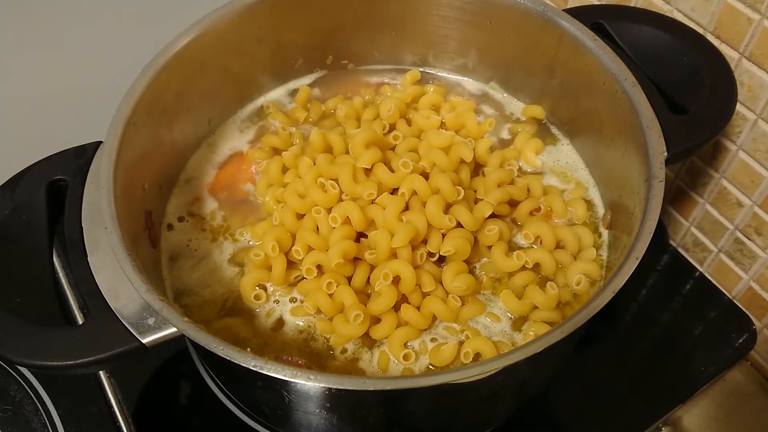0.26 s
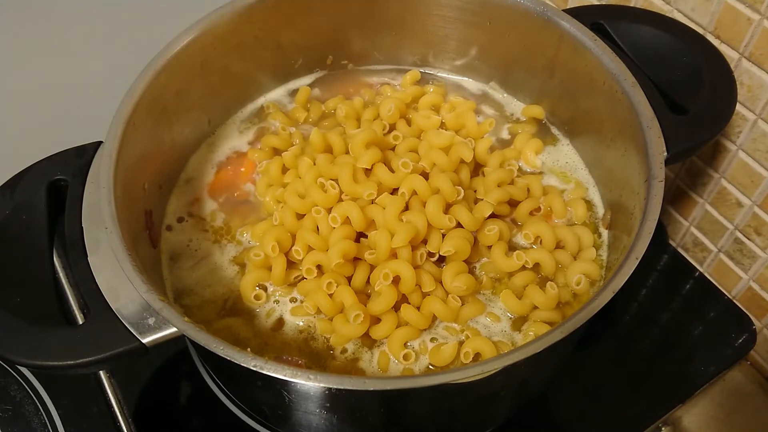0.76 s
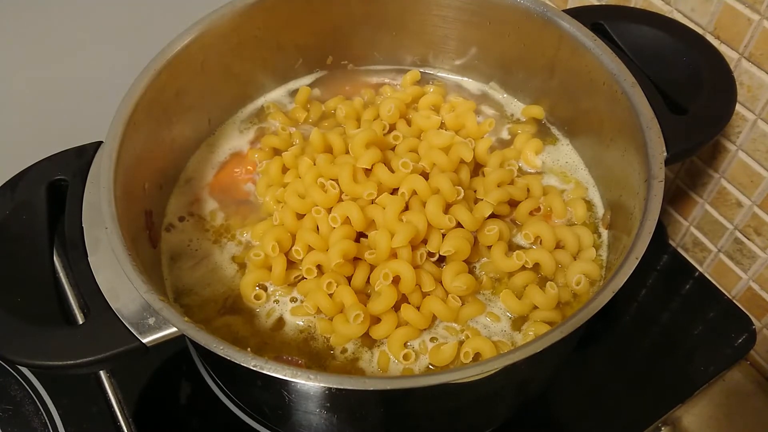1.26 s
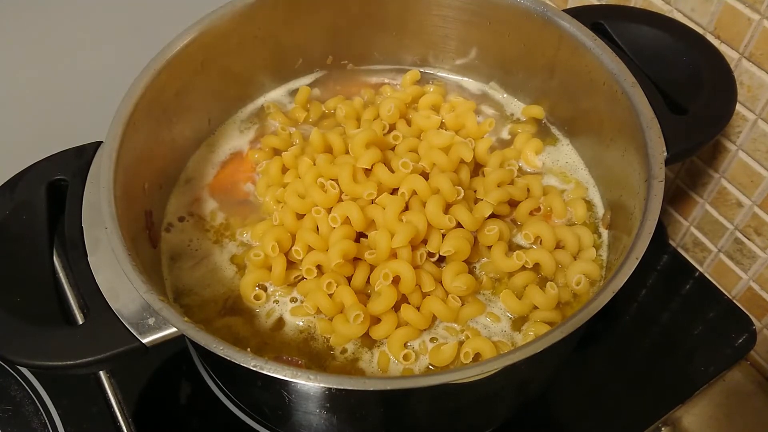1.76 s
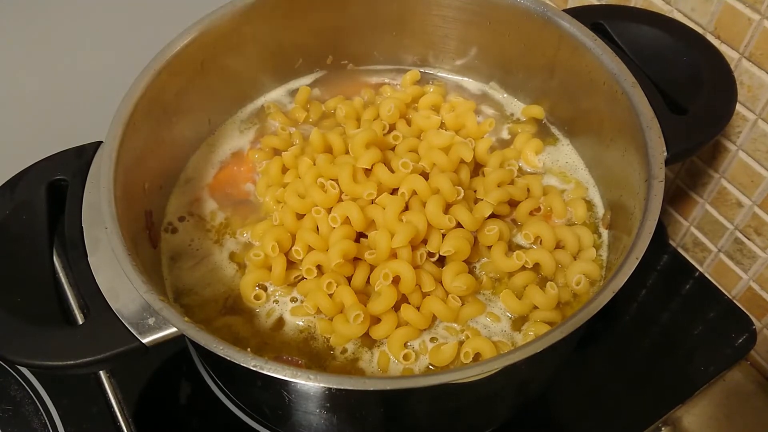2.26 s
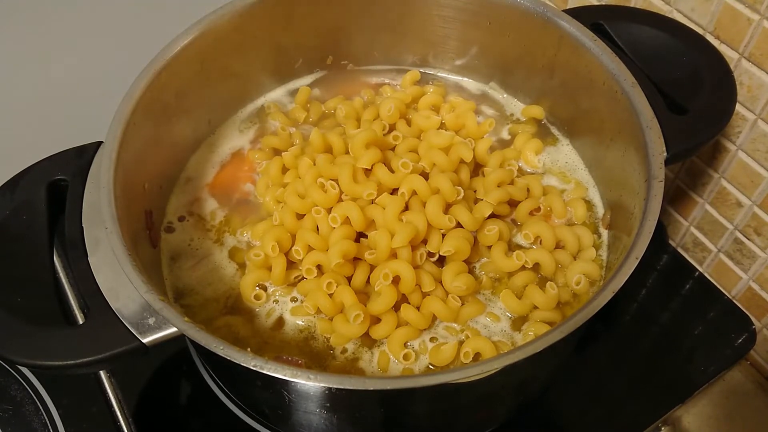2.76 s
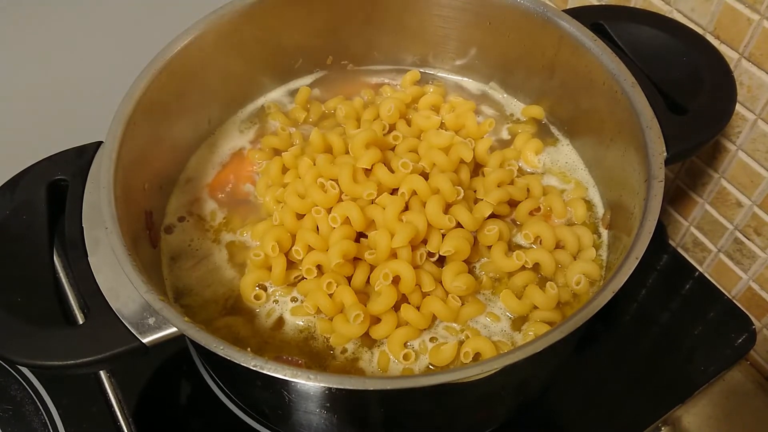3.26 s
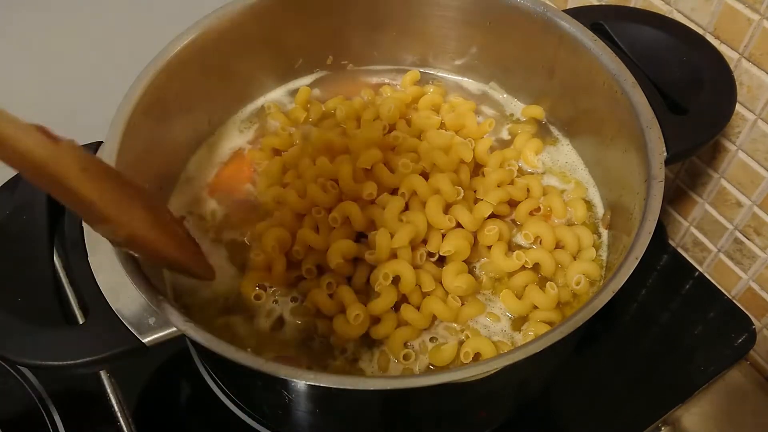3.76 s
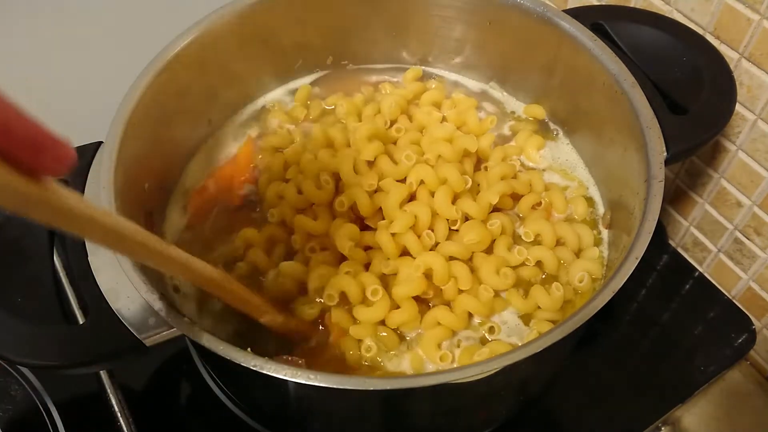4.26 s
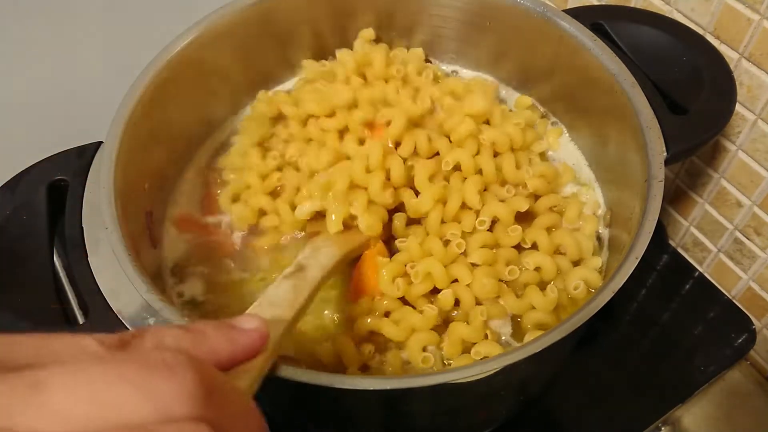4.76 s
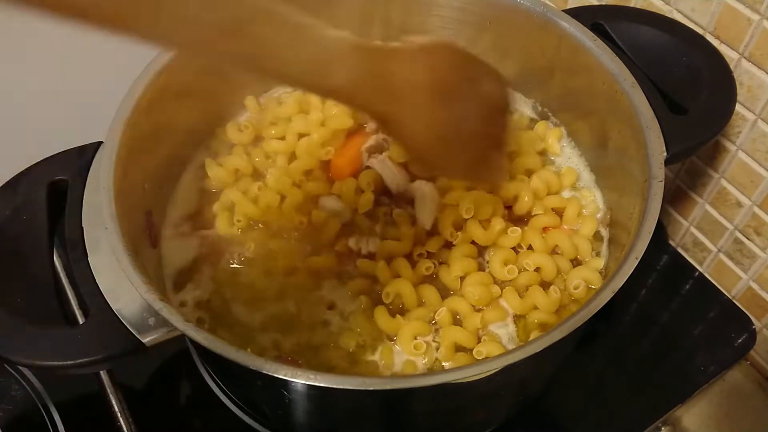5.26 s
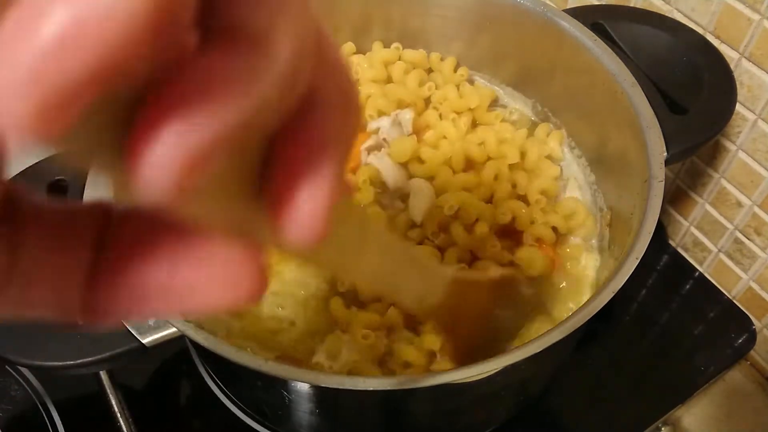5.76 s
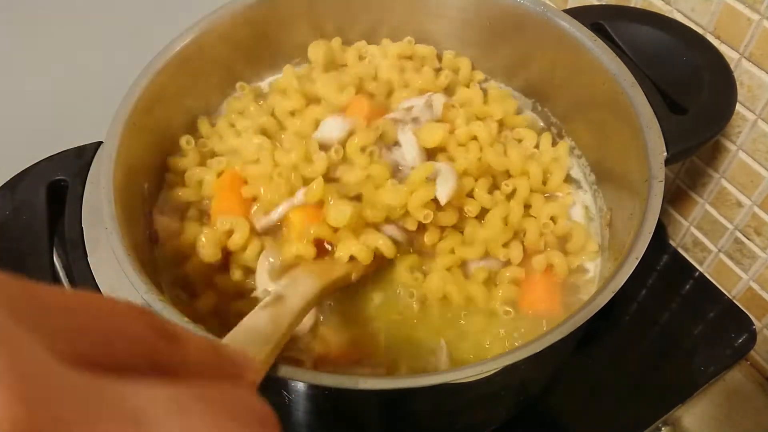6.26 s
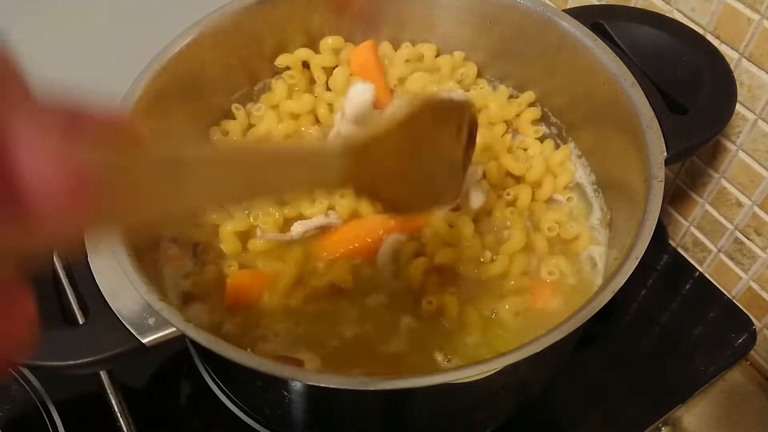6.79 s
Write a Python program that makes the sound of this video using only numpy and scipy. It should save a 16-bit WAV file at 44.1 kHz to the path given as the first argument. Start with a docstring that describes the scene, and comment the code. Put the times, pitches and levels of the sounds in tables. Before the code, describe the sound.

Over a faint fizz and hob hum come two ringing clatters, followed by hard macaroni being stirred through sloshing broth.

```python
"""Macaroni simmers in a steel pot of broth and is stirred, close to the microphone in a small tiled kitchen.
The foam fizzes and pops a little to the right, over the rumble of the pot and the hum of the hob.
A utensil clinks, and something hard is set down nearby with two loud, ringing clatters.
Then a wooden spoon knocks on the pot and turns the still hard pasta over: the broth sloshes, wet tubes
crackle against each other and tick on the steel, and a few air pockets glug."""
import sys
import numpy as np
from scipy import signal
from scipy.fft import rfft, irfft
from scipy.io import wavfile
from scipy.ndimage import uniform_filter1d

SR = 44100
rng = np.random.default_rng(int(sys.argv[2]) if len(sys.argv) > 2 else 0)


def pcm_store(signal):
    """Save signal as 16-bit PCM."""
    levels = np.round(np.clip(np.atleast_2d(signal), -1, 1) * 32767)
    wavfile.write(sys.argv[1], SR, levels.astype(np.int16).T)


N = 310023

# pushes of the spoon through the pasta: [strongest_s, rise_s, fall_s, crackle_db, slosh_db, spray_db]
SPOON_PUSHES = [(4.11, 0.05, 0.3, -61, -55.5, -86), (4.42, 0.32, 0.6, -55, -60.5, -61),
                (4.71, 0.22, 0.2, -50, -53, -53.5), (4.9, 0.07, 0.32, -43, -49, -50),
                (5.13, 0.17, 0.24, -55, -56, -56), (5.589, 0.08, 0.6, -66, -54, -84),
                (5.99, 0.26, 0.2, -61, -59, -59.5), (6.141, 0.1, 0.25, -53, -49, -59),
                (6.419, 0.26, 0.28, -52.5, -51.5, -72), (6.74, 0.25, 0.36, -60, -54, -69)]
# tone colours of sloshing broth, rubbing pasta and the finest spray: [frequency_hz, relative_db]
SLOSH_SPECTRUM = [(150, -17.5), (330, 2), (400, -13.5), (540, 0.5), (680, -5), (830, 2.5), (960, -4.5),
                  (1150, -1), (1700, 0), (2600, -7.5), (5000, -44)]
CRACKLE_SPECTRUM = [(900, -4), (2000, -1), (2800, -10), (3150, -2.5), (3550, 2), (4400, 6), (6000, 2),
                    (8200, 12.5), (10000, 0), (15000, -39)]
SPRAY_SPECTRUM = [(6000, 11), (10000, 1.5), (12000, -4), (15500, -0.5), (17000, -35)]
# modes of the pot wall that sing along with the crackle: [pitch_hz, relative_db]
POT_WALL_MODES = [(3115, -11.5), (4840, -24), (5060, -24.5), (7975, -18)]
# the sharpest ticks, of bursting foam and later of pasta and spoon on the steel:
# [start_s, level_db, pitch_hz, left_over_right_db, top_octave_db]
SHARP_TICKS = [(0.3018, -43, 2040, -4.0, -78), (1.2694, -47.5, 2030, -1, -82),
               (1.3259, -50.5, 3250, -2, -81), (3.038, -39, 2920, -5.5, -80), (4.0694, -36, 3770, 0, -68),
               (4.2423, -39, 4140, 0, -63), (4.4792, -34, 8650, -2.5, -54), (4.618, -33.5, 8940, 0, -54),
               (4.672, -26.5, 4800, -2, -54), (4.7485, -25.5, 3340, -5, -47), (4.834, -30, 4430, -2, -57),
               (4.8964, -18.5, 5060, -2, -47), (5.0179, -29, 7570, -4, -49), (5.048, -24.5, 4270, -3, -54),
               (5.1804, -34.5, 2250, 0, -50.5), (5.4961, -21.5, 4060, 1, -58), (5.5672, -26, 2560, -1, -68),
               (5.5866, -27, 2820, -3, -62), (5.662, -32.5, 1590, -1, -77), (5.785, -35.5, 3630, -3, -71),
               (5.95, -31.5, 5600, -6.5, -67), (6.122, -31.5, 6060, -1, -51.5),
               (6.1873, -31, 3230, -2.0, -73), (6.3774, -31, 3200, -9, -73), (6.4468, -35.5, 2380, -2, -71),
               (6.5134, -28, 5140, 0, -47), (6.7524, -35.5, 2570, 6, -73)]
# dull knocks on the pot, mostly from the wooden spoon: [start_s, relative_db, dull_above_hz, t60_s]
POT_KNOCKS = [(0.3046, -44.5, 500, 0.018), (3.7693, -32, 2230, 0.073), (3.8559, -38, 546, 0.13),
              (4.093, -42, 2180, 0.065), (5.4171, -42.5, 750, 0.19), (5.4726, -35, 2980, 0.034),
              (5.4978, -31, 3500, 0.015), (6.446, -37.5, 1500, .04)]
# single air pockets in the broth: [start_s, level_db, first_pitch_hz, last_pitch_hz, length_s]
AIR_POCKETS = [(3.072, -45, 662, 630, 0.019), (3.112, -52.5, 756, 636, 0.043),
               (4.395, -50.5, 2120, 2160, 0.018), (4.59, -49, 161, 171, 0.027),
               (4.716, -32.5, 378, 252, 0.022), (5.223, -42.5, 2090, 2200, 0.0089),
               (5.409, -44, 430, 314, 0.019), (6.076, -46, 305, 355, 0.059),
               (6.864, -43.5, 1510, 1730, 0.0044)]
# tone colour of the fizzing foam: [frequency_hz, relative_db]
FIZZ_SPECTRUM = [(200, -6), (500, 2), (900, 4.5), (1300, -1.5), (2100, 1), (3000, -6.5), (4000, -10),
                 (4900, -12), (7000, -18), (10000, -23.5), (16000, -46)]
# contacts of the hard object: [start_s, thud_db, ring_db, flatness (0 on edge, 1 flat), treble_db]
OBJECT_CONTACTS = [(2.2528, -14, -27, 0.6, -12), (2.2575, -10, -15, 0.24, 3.5),
                   (2.2616, -12.5, -48, 0.2, 8), (2.2815, -24, -32, 0.2, 11), (2.3543, -20, -32.5, 0.2, -3),
                   (2.6399, -9, -17, 0.96, -3.5), (2.6532, -23.5, -35, 1, 9.5),
                   (2.6603, -24.5, -32, 0.8, 11)]
# tone colour of the object's dull body: [frequency_hz, relative_db]
THUD_SPECTRUM = [(100, -30), (400, -12), (490, -13), (580, -1.5), (850, -0.5), (1250, -4.5), (1700, -7),
                 (2050, -5.5), (2700, -8), (3750, -19.5), (4400, -10), (5100, -29), (5600, -22),
                 (8500, -27), (15000, -51)]
# the object's strong modes: [pitch_hz, struck_on_edge_db, struck_flat_db, t60_s]
OBJECT_MODES = [(556, -9.5, -10, 0.13), (602, -16, -9.5, 0.17), (711, -23, 0.5, 0.12),
                (833, -12.5, -30, 0.39), (928, -13.5, -19, 0.26), (1034, -9.5, -34, 0.5),
                (1104, -12, -16, 0.16), (1257, -17.5, -25, 0.27), (1450, -15, -20, 0.51),
                (1560, -4, 3.5, 0.21), (1720, -22, -19, 0.13), (1898, 6.5, -12.5, 0.28),
                (1958, -1, -13.5, 0.21), (2016, -3.5, -1.5, 0.22), (2170, -23, -0.5, 0.14),
                (2470, -19, -6, 0.37), (2576, -7.5, -10, 0.39), (2710, -24, -14.5, 0.35),
                (2860, -15.5, -24.5, 0.36), (3250, -3, -9.5, 0.2), (3310, -3, -14, 0.21),
                (3473, -20, -18.5, 0.36), (4080, -17, -17, 0.19), (4345, -11.5, -33, 0.27),
                (4500, -15, -13, 0.19), (5500, -11.5, -29, 0.26), (5560, -13.5, -19, 0.17),
                (6500, -20.5, -27.5, 0.26), (6785, -16, -36.5, 0.21), (7275, -16, -40, .25),
                (9660, -28.5, -43, 0.28), (13600, -36.5, -44, 0.25)]
# outline of its crowd of weak high modes: [frequency_hz, relative_db]
OVERTONE_SPECTRUM = [(3400, -22.5), (4400, -17.5), (5100, -46.5), (5700, -28), (8400, -30), (9200, -38),
                     (13800, -40)]
# the utensil's touch: [start_s, relative_db]
UTENSIL_CONTACTS = [(2.0345, -22.5)]
# tone colour of the utensil: [frequency_hz, relative_db]
UTENSIL_SPECTRUM = [(300, -15), (700, -15.5), (880, 6), (1050, -20.5), (2200, -14.5), (2950, 1),
                    (3300, -3.5), (3950, 1), (4300, -16), (5800, -26), (6550, -11), (7200, -23),
                    (10500, -28), (15500, -38)]
# swells of the hob's hum: [start_s, length_s, level_db]
HUM_SWELLS = [(0.0, 0.36, -53.5), (0.374, 0.36, -46), (1.105, 0.54, -47.5), (1.51, 0.36, -46.5),
              (6.5, 0.33, -53.5)]
# tone colour of the heated pot's rumble: [frequency_hz, relative_db]
RUMBLE_SPECTRUM = [(25, -29.5), (42, -34), (62, 1), (80, -3.5), (98, 0.5), (160, 0), (205, -9.5), (250, -4),
                   (285, -12.5), (335, -4), (385, -17), (480, -13.5), (700, -27.5), (1500, -64.5)]
# reverberation of the tiled kitchen: [frequency_hz, t60_s]
KITCHEN_DECAY = [(250, 0.53), (800, 0.23), (2200, 0.38), (6000, 0.21), (14000, 0.27)]


def stirring():
    """The spoon sloshes broth, rubs wet pasta, squeezes air from the tubes and tears films of foam."""
    clumping = from_db(1.3 * drift(rate_hz=34))  # the pasta catches and gives way in clumps
    crackle_gain, slosh_gain, spray_gain = spoon_pushes() * clumping
    slosh = grains(low_hz=280, high_hz=3500, cycles=14, spread_db=3, count=2800)
    crackle = grains(low_hz=1500, high_hz=11000, cycles=11, spread_db=3.6, count=3000)
    squelch = grains(low_hz=2000, high_hz=7500, cycles=55, spread_db=3.5, count=600)
    spray = grains(low_hz=8500, high_hz=16000, cycles=7, spread_db=4, count=1500)
    rubbing = rms_one(coloured(crackle + squelch, CRACKLE_SPECTRUM)) + pot_wall(crackle)
    wet_pasta = (slosh_gain * rms_one(coloured(slosh, SLOSH_SPECTRUM))
                 + crackle_gain * rms_one(rubbing)
                 + spray_gain * rms_one(coloured(spray, SPRAY_SPECTRUM)))
    touches = pasta_touches(activity=crackle_gain + slosh_gain)
    return kitchen(wet_pasta, wet_db=-3, build_s=0.00058) * panned(-1.2) + ticks(touches, wet_db=-9.5)


def spoon_pushes():
    """Gains of crackle, slosh and spray over time: each push builds and dies away on a hollow curve."""
    t, power = np.arange(N) / SR, np.zeros((3, N))
    for strongest_s, rise_s, fall_s, *levels_db in SPOON_PUSHES:
        rising, falling = 1 + (t - strongest_s) / rise_s, 1 - (t - strongest_s) / fall_s
        effort = np.clip(np.minimum(rising, falling), 0, 1) ** 1.3
        power += (from_db(levels_db)[:, None] * effort) ** 2
    return np.sqrt(power)


def pot_wall(crackle, width_hz=39):
    """The steel wall picks narrow bands out of the crackle and sings along."""
    return sum(from_db(db) * rms_one(cut(crackle, [hz - width_hz / 2, hz + width_hz / 2], "band", order=1))
               for hz, db in POT_WALL_MODES)


def pasta_touches(activity, count=48, low_hz=2420, high_hz=7000, spread_db=2):
    """Rows for ticks(): hard tubes hit the steel more often and louder as more of them are moved."""
    when, size, pitch, place = rng.random((count, 4)).T
    share_stirred = np.cumsum(activity) / np.sum(activity)
    at = np.searchsorted(share_stirred, (np.arange(count) + when) / count)
    level_db = -33.5 + 10 * np.log10(activity[at] / activity.max()) + spread_db * (2 * size - 1)
    pitch_hz = low_hz * (high_hz / low_hz) ** pitch
    left_db, top_db = 1 - 6 * place, level_db - 30
    return np.column_stack([at / SR, level_db, pitch_hz, left_db, top_db])


def ticks(rows, wet_db, crest_db=22, lead_in_s=0.004, lead_in_db=-22):
    """Small snaps in the pot, each with a brief pitched ring and a bright top."""
    out = np.zeros((2, N))
    for start_s, level_db, hz, left_db, top_db in rows:
        snap = burst(t60_s=0.017, alike=0.33) + from_db(-4.5) * burst(t60_s=0.04, alike=0.12)
        ring = cut(snap, [hz / 1.06, hz * 1.06], "band", order=1)
        tick = cut(snap, [hz / 1.53, hz * 1.94], "band", order=1) + from_db(4.5) * ring
        tick = cut(cut(tick, 8300, "low", order=4), 720, "high")
        tick = from_db(level_db - crest_db) * rms_one(tick)
        top = cut(burst(t60_s=0.018, alike=0.25), [7500, 14000], "band")
        top = from_db(top_db - 10.5) * rms_one(top)
        # a faint lead-in just ahead softens each tick's attack
        add(out, start_s - lead_in_s * rng.uniform(0.5, 1), from_db(lead_in_db) * panned(left_db) * tick)
        add(out, start_s, panned(left_db) * (tick + top))
    return kitchen(out, wet_db=wet_db, build_s=0.001)


def pot_knocks():
    """Wood on the liquid-damped pot: a short, dull blow, answered by a hollow thud."""
    out = np.zeros((2, N))
    for start_s, level_db, dull_hz, t60_s in POT_KNOCKS:
        blow = burst(t60_s, alike=0.21, length_s=0.2)
        hollow = from_db(0.5) * cut(blow, [310, 520], "band")
        knock = cut(cut(blow, dull_hz, "low"), 240, "high") + hollow
        add(out, start_s, from_db(level_db + 5) * knock / np.abs(knock).max())
    return kitchen(out, wet_db=-9, build_s=0.02)


def bubbles():
    """Air pockets in the broth ring briefly, gliding as they change shape."""
    out = np.zeros((2, N))
    for start_s, level_db, first_hz, last_hz, length_s in AIR_POCKETS:
        age = seconds(length_s) / length_s
        phase = 2 * np.pi * np.cumsum(first_hz + (last_hz - first_hz) * age) / SR
        add(out, start_s, from_db(level_db) * np.sin(np.pi * age ** 1.04) * np.sin(phase))
    return kitchen(out, wet_db=-10, build_s=0.007) * panned(-7.5)


def simmer():
    """Foam fizzes evenly just right of the microphone, with a faint prickle of bursting bubbles."""
    fizz = coloured(noise_pair(N, alike=0.061), FIZZ_SPECTRUM) * from_db(-60.5 + 1.1 * drift(rate_hz=12))
    prickle = grains(low_hz=900, high_hz=7000, cycles=12, spread_db=4, count=260)
    prickle = kitchen(cut(prickle, 4000, "low", order=1), wet_db=-8, build_s=0.0027)
    return (fizz + from_db(-71.5) * prickle) * panned(-2.8)


def foam_pops():
    """Now and then a larger bubble bursts in the foam with a short pitched pip."""
    pips = grains(low_hz=1200, high_hz=5000, cycles=40, spread_db=2, count=70)
    pips = kitchen(cut(pips, 2500, "low", order=1), wet_db=-12, build_s=0.002)
    return from_db(-73) * pips * panned(-2.5)


def clatter():
    """Nearby, a hard object lands on its edge, bounces and drops flat; each contact thuds and rings."""
    thuds, rings, t = np.zeros((2, N)), np.zeros((2, N)), seconds(0.5)
    hz, edge_db, flat_db, t60_s = object_modes().T
    attack = 1 - np.exp(-t / 0.0012)
    modes = np.exp((2j * np.pi * hz - np.log(1000) / t60_s)[:, None] * t) * attack
    phase_offset = np.minimum(hz / 2200, 0.75)  # higher modes differ more between left and right
    for start_s, thud_db, ring_db, flatness, treble_db in OBJECT_CONTACTS:
        thud = burst(t60_s=0.036, alike=0.94)
        shelf = (from_db(treble_db) - 1) * cut(thud, 2500, "high", order=1)
        add(thuds, start_s, from_db(thud_db) * (thud + shelf))
        strength = from_db(ring_db + edge_db + flatness * (flat_db - edge_db))
        phase = 2 * np.pi * rng.random(len(hz))
        phase = phase + phase_offset * rng.choice([-1, 1], len(hz)) * [[1], [-1]]
        add(rings, start_s, ((strength * np.exp(1j * phase)) @ modes).real)
    sound = from_db(-3) * kitchen(coloured(thuds, THUD_SPECTRUM), wet_db=-3, build_s=0.004) + rings
    # the object is off to the right, so its treble is shaded on the left
    treble = cut(sound + 1e-18, 930, "high", order=1)
    return (sound - treble) * panned(3) + treble * panned(-5.5)


def object_modes(weak_count=42, weak_t60_s=0.27):
    """The hard object's strong modes, plus weak high ones, about evenly spaced and of chance strength."""
    hz = np.linspace(3700, 13800, weak_count) + rng.uniform(-70, 70, weak_count)
    edge_db = at_hz(OVERTONE_SPECTRUM, hz) + 3.34 * rng.standard_normal(weak_count)
    weak_modes = np.column_stack([hz, edge_db, edge_db - 6, np.full(weak_count, weak_t60_s)])
    return np.vstack([OBJECT_MODES, weak_modes])


def clink():
    """To the right, a utensil touches something hard once."""
    out = np.zeros((2, N))
    for start_s, level_db in UTENSIL_CONTACTS:
        add(out, start_s, from_db(level_db - 2.5) * burst(t60_s=0.033, alike=0.19))
    return kitchen(coloured(out, UTENSIL_SPECTRUM), wet_db=-6, build_s=0.004) * panned(-4.5)


def hob(hum_hz=125.6, settle_start_s=3.65, settle_length_s=1.0):
    """A wavering, swelling hum over the heated pot's rumble; both sink a little as the stirring starts."""
    t = np.arange(N) / SR
    settled_db = -2 * np.clip((t - settle_start_s) / settle_length_s, 0, 1)
    swells = sum(from_db(db) * np.sin(np.pi * np.clip((t - start_s) / length_s, 0, 1))
                 for start_s, length_s, db in HUM_SWELLS)
    level = from_db(-55 + settled_db + 2.2 * drift(rate_hz=6)) + swells
    phase = 2 * np.pi * np.cumsum(hum_hz + 1.34 * drift(rate_hz=12)) / SR
    hum = level * from_db(1.2 * drift(rate_hz=9.1)) * np.sin(phase)
    rumble = from_db(-53.5 + settled_db) * coloured(noise_pair(N, alike=0.94), RUMBLE_SPECTRUM)
    return (hum + rumble) * panned(-5)


def kitchen(x, wet_db, build_s):
    """Direct sound plus the tiled room's diffuse tail, duller as it dies and centred only in the bass."""
    t, edges_hz = seconds(0.45), np.geomspace(60, 18000, 8)
    mid, side = rng.standard_normal((2, len(t)))
    noise = mid + cut(side, 390, "high", order=1) * [[1], [-1]]
    noise = np.hstack([evened(part, width_hz=60) for part in np.array_split(noise, 15, axis=1)])
    tail = np.zeros_like(noise)
    for low_hz, high_hz in zip(edges_hz, edges_hz[1:]):
        t60_s = at_hz(KITCHEN_DECAY, np.sqrt(low_hz * high_hz))
        tail += cut(noise, [low_hz, high_hz], "band", order=1) * from_db(-60 * t / t60_s)
    tail = rms_one(tail * (1 - np.exp(-t / build_s))) / np.sqrt(len(t))
    return x + from_db(wet_db) * signal.fftconvolve(x, tail, axes=1)[:, :N]


def grains(low_hz, high_hz, cycles, spread_db, count):
    """Tiny pops at random moments, each ringing briefly at its own slightly rising pitch; rms 1."""
    when, pitch, damping, size, place = rng.random((5, count, 1))
    t = seconds(0.011)
    hz = low_hz * (high_hz / low_hz) ** pitch
    t60_s = np.minimum(cycles * 4 ** (damping - 0.5) / hz, 0.018)
    strength = from_db(-spread_db * np.log(size + 0.02)) / np.sqrt(t60_s)
    phase = 2 * np.pi * hz * t * (1 + 0.018 * t / t60_s)
    pops = strength * from_db(-60 * t / t60_s) * np.sin(phase)
    at = (when * (N - 2 * len(t))).astype(int) + np.arange(len(t))
    left_lag = (18 * place).astype(int)  # samples; a pop's place sets how late it reaches the left side
    return rms_one(np.array([np.bincount((at + lag).ravel(), pops.ravel(), N) for lag in (left_lag, 0)]))


def burst(t60_s, alike, length_s=0.12):
    """The crowded, quickly dying vibration that follows a contact."""
    t = seconds(length_s)
    fade = from_db(-60 * t / t60_s)
    noise = evened(noise_pair(len(t), alike) * np.sqrt(fade), width_hz=153) * np.sqrt(fade)
    return rms_one(noise) * np.sqrt(np.mean(fade ** 2))


def noise_pair(count, alike):
    """Left and right white noise with correlation `alike`."""
    mid, side = rng.standard_normal((2, count))
    return (np.sqrt(1 + alike) * mid + np.sqrt(1 - alike) * side * [[1], [-1]]) / np.sqrt(2)


def drift(rate_hz):
    """A slow random wander through points of spread 1."""
    knots = rng.standard_normal(1000)
    return np.interp(np.arange(N) / SR * rate_hz, np.arange(len(knots)), knots)


def evened(x, width_hz):
    """Level a noise's spectrum over the given width, so that it has no colour of its own; rms 1."""
    spectrum = rfft(x)
    power = uniform_filter1d(np.abs(spectrum) ** 2, max(1, int(width_hz * x.shape[-1] / SR)))
    return rms_one(irfft(spectrum / np.sqrt(power + 1e-20), x.shape[-1]))


def coloured(x, spectrum, size=8192):
    """Minimum-phase filter with the given spectrum; white noise keeps its power."""
    gain = rms_one(from_db(at_hz(spectrum, np.fft.rfftfreq(size, 1 / SR))))
    cepstrum = irfft(np.log(gain))[:size // 2]
    cepstrum[0] /= 2
    response = irfft(np.exp(rfft(2 * cepstrum, size)))[:size // 2]
    return signal.fftconvolve(x, response[None], axes=1)[:, :x.shape[1]]


def cut(x, hz, kind, order=2):
    """Butterworth filter."""
    return signal.sosfilt(signal.butter(order, np.clip(hz, 10, 0.45 * SR), kind, fs=SR, output="sos"), x)


def at_hz(table, hz):
    """Read a table on a log-frequency axis."""
    table_hz, values = np.transpose(table)
    return np.interp(np.log(np.maximum(hz, 1)), np.log(table_hz), values)


def panned(left_db):
    """Channel gains with the left `left_db` above the right."""
    return from_db(np.array([[left_db], [-left_db]]) / 2)


def add(out, start_s, sound):
    """Mix a sound in at its start time."""
    i = int(start_s * SR)
    out[:, i:i + sound.shape[-1]] += sound[..., :N - i]


def seconds(length_s):
    """Time axis of a short sound."""
    return np.arange(int(length_s * SR)) / SR


def from_db(db):
    """Decibels to gain."""
    return 10 ** (np.asarray(db) / 20)


def rms_one(x):
    """Scale to rms 1."""
    return x / np.sqrt(np.mean(x ** 2) + 1e-20)


def scene():
    """Everything that reaches the stereo microphone beside the hob."""
    pot = hob() + simmer() + foam_pops() + bubbles()
    contacts = pot_knocks() + ticks(SHARP_TICKS, wet_db=-8)
    return pot + contacts + stirring() + clatter() + clink()


def record(dry, ceiling=1.1, cutoff_hz=16000):
    """The microphone chain rounds the highest peaks and cuts the top steeply."""
    rounded = ceiling * np.tanh(dry / ceiling)
    return signal.sosfilt(signal.ellip(10, 0.3, 80, cutoff_hz, fs=SR, output="sos"), rounded)


dry = scene()
out = record(dry)
pcm_store(out)
```